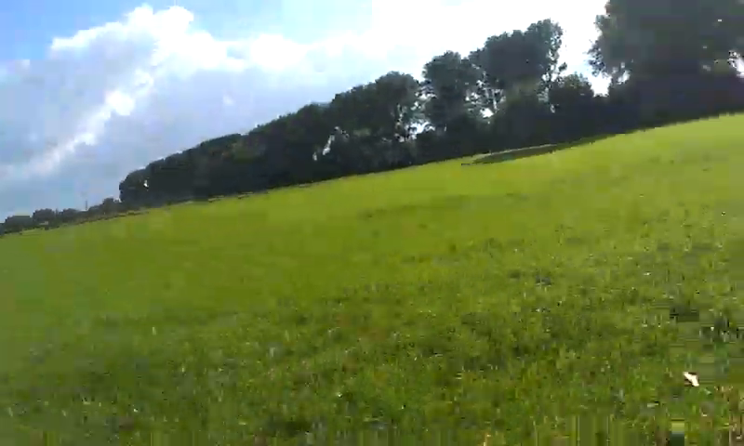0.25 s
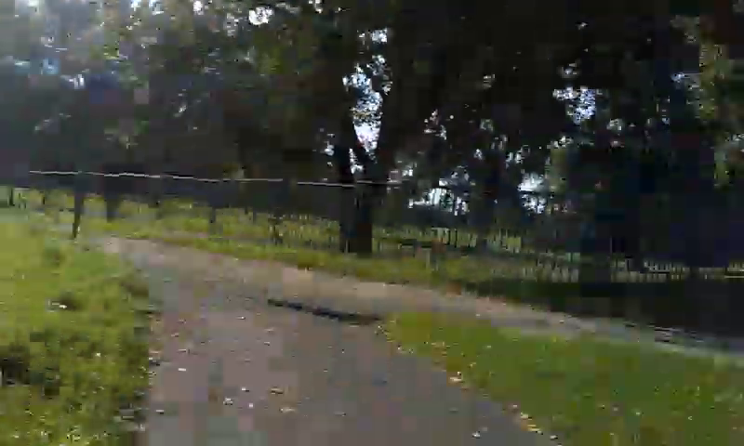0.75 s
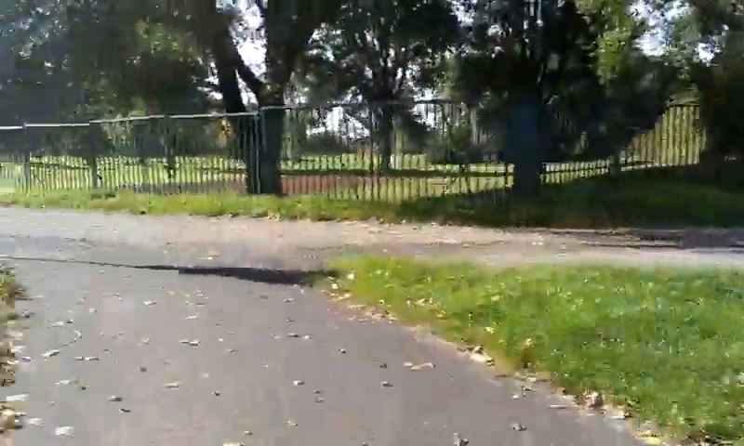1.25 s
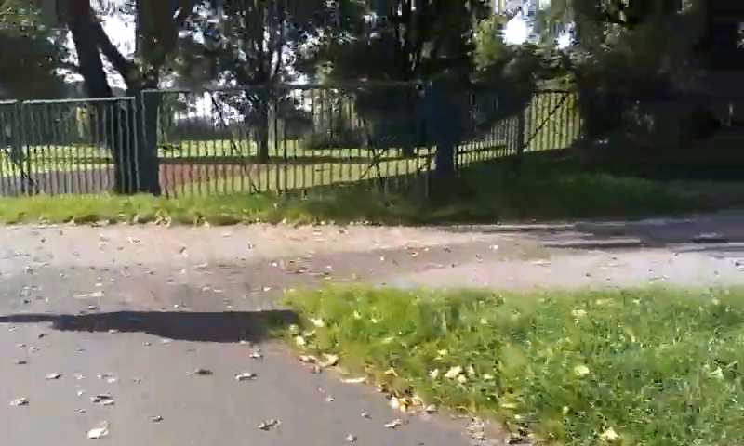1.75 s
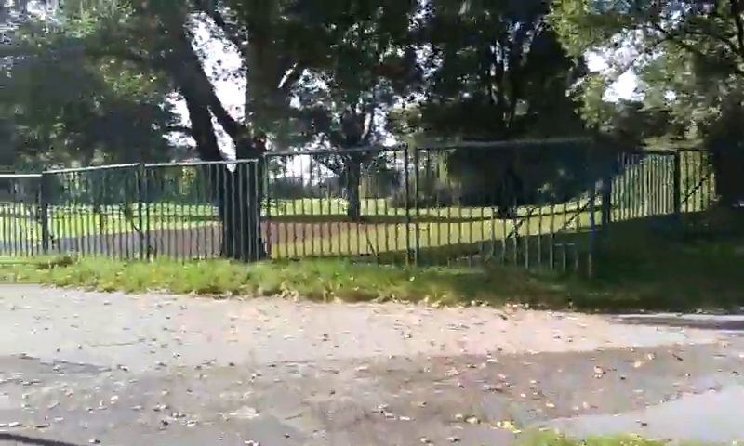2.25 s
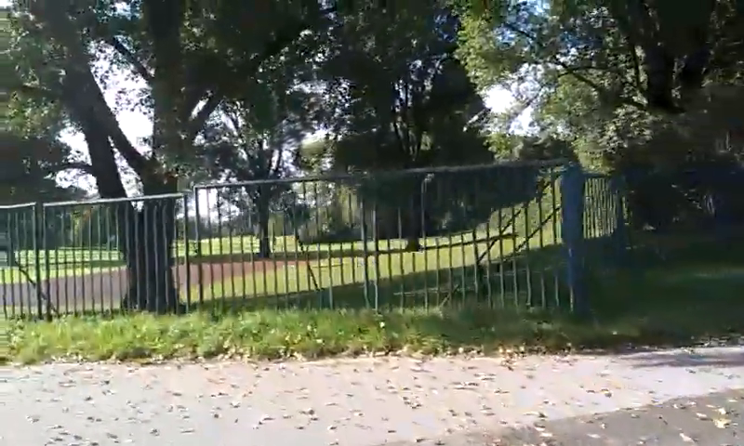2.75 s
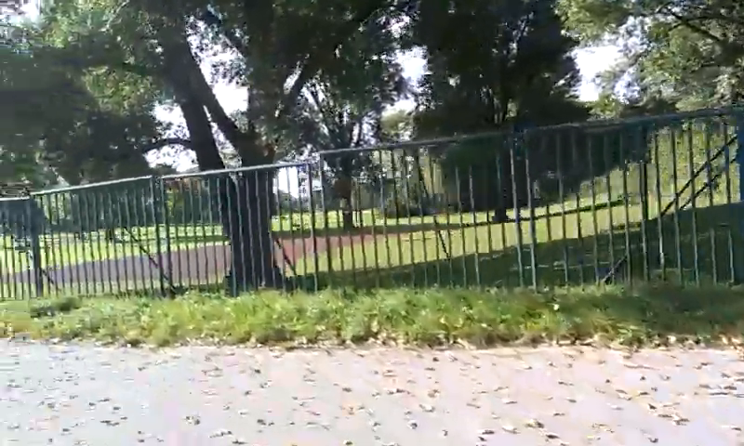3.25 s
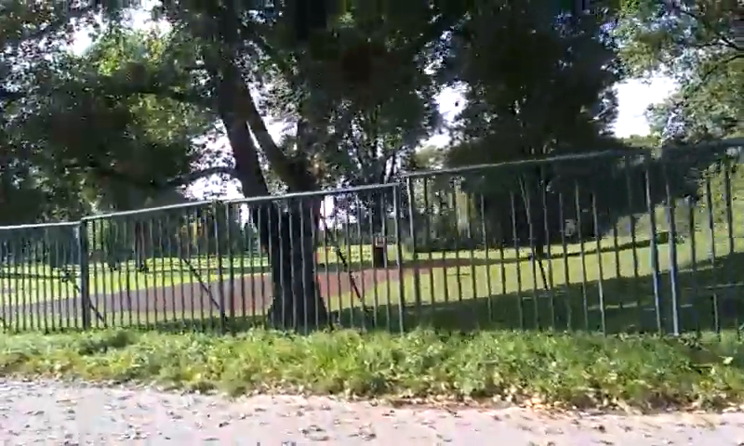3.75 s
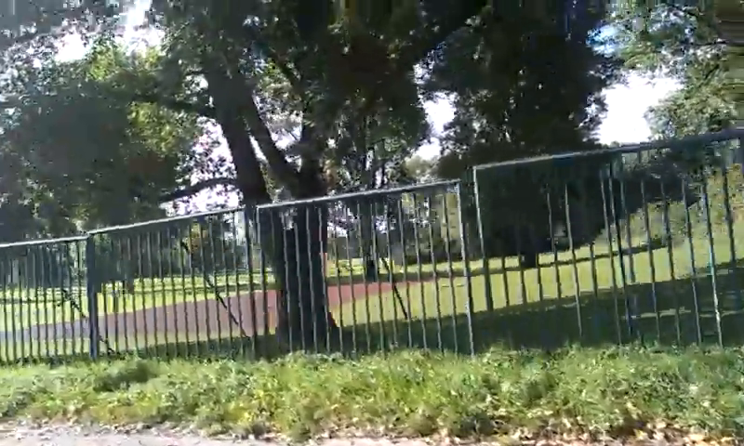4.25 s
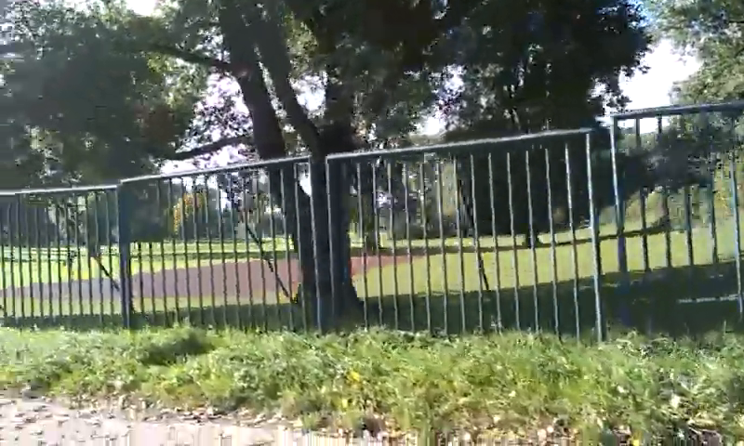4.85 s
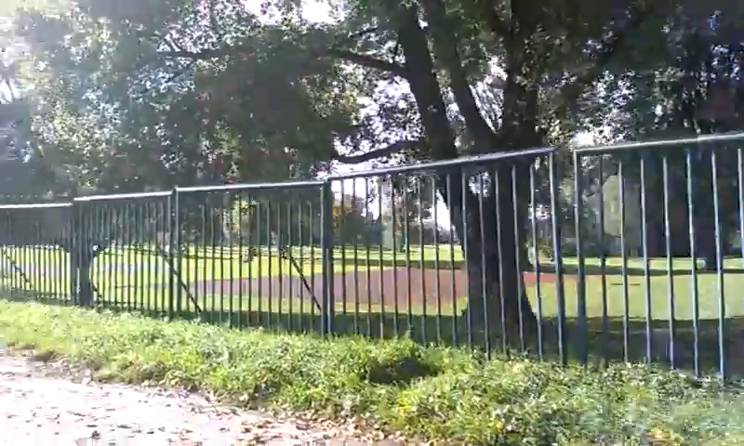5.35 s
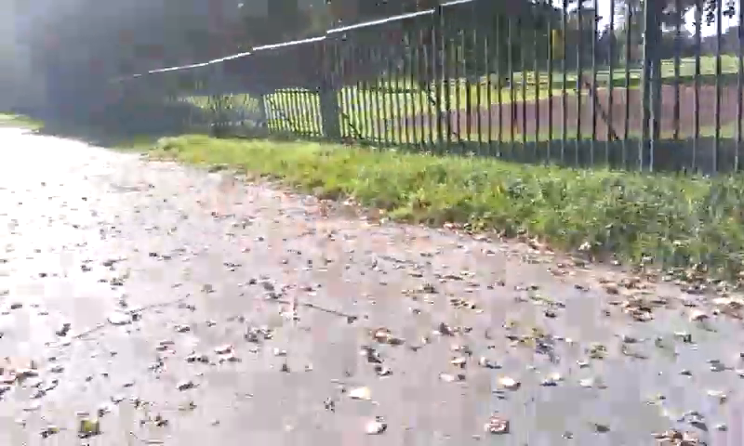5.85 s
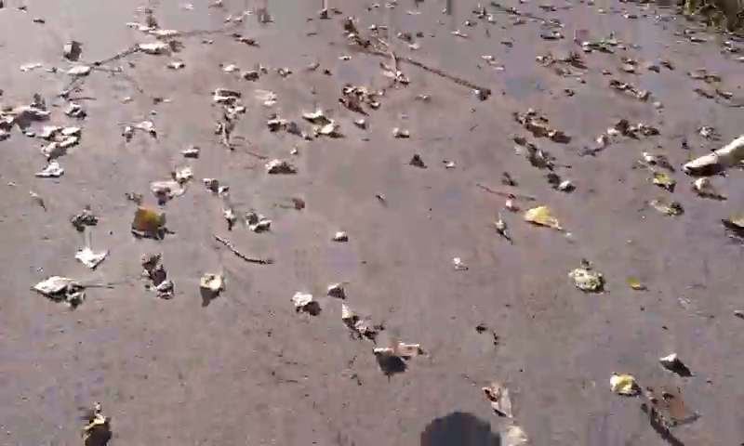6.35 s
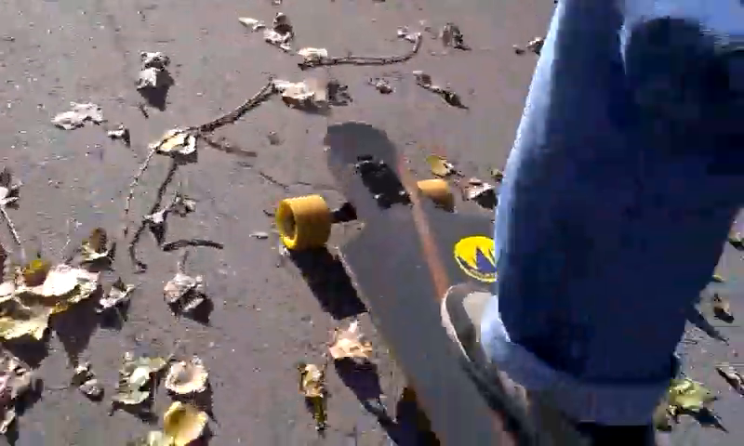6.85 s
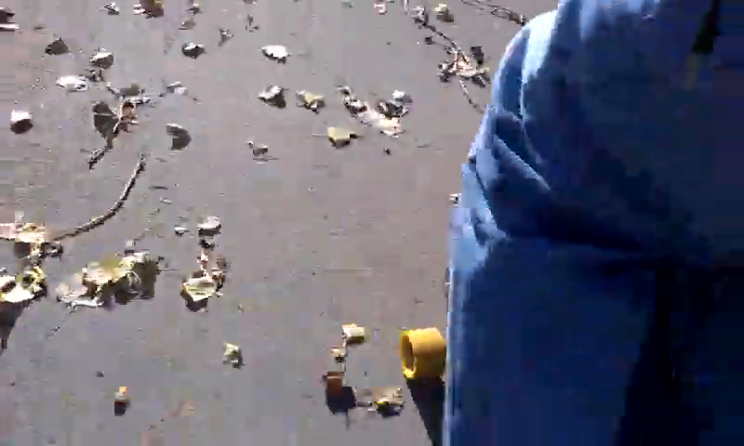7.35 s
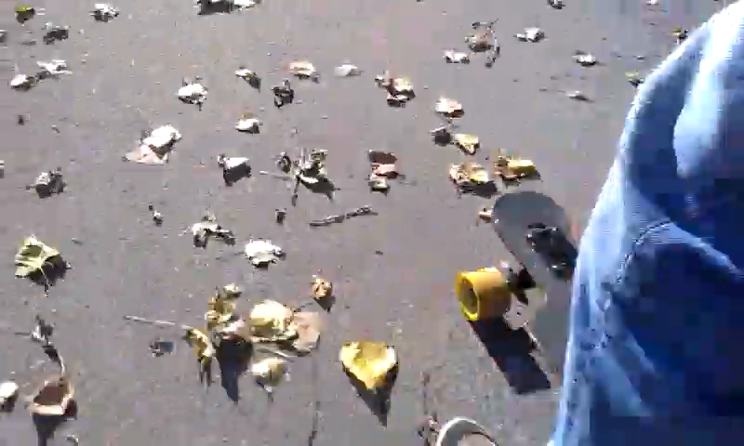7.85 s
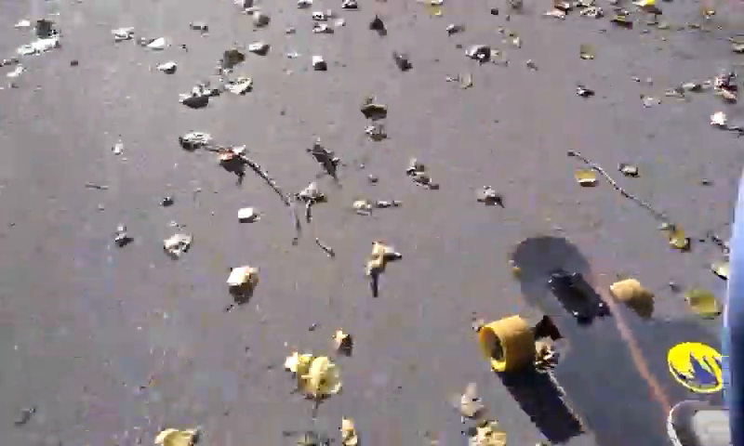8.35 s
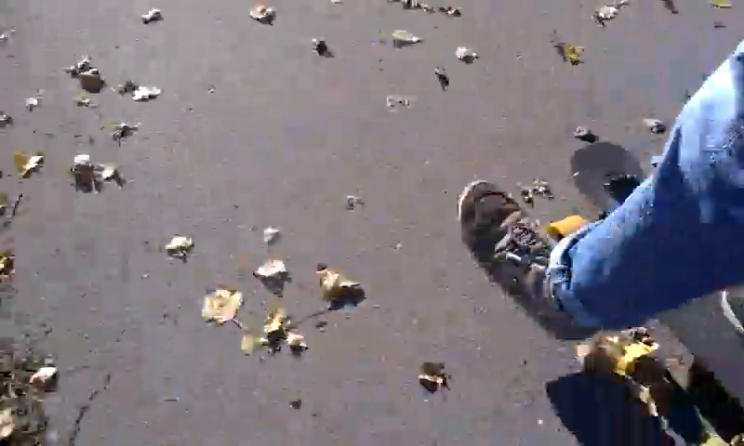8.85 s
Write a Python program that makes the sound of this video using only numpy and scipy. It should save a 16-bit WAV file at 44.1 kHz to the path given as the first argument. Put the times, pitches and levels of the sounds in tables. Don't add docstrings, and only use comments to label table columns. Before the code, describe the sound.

Rough gritty skateboard rolling outdoors, with deck rattles, stone knocks and crackling leaves, ending in loud, distorted bursts of wind buffeting.

```python
import sys
import numpy as np
from scipy import signal
from scipy.fft import rfft, irfft, next_fast_len
from scipy.io import wavfile
from scipy.ndimage import uniform_filter1d, map_coordinates

SR = 44100
rng = np.random.default_rng(int(sys.argv[2]) if len(sys.argv) > 2 else 0)


def natural_amplitude(level_db):
    exponent = np.asarray(level_db, float) / 20
    return 10 ** exponent


def file_out(sig):
    cols = np.atleast_2d(sig).T
    lim = np.clip(cols, -1, 1)
    pcm = np.round(lim * 32767).astype(np.int16)
    wavfile.write(sys.argv[1], SR, pcm)


N = 402191

# centre_hz, width_hz, level_db
AXLE_MODES = [(1585, 190, 8.5), (2208, 155, 12), (3000, 2000, 0.5)]


def unit(x):
    return x / np.sqrt(np.mean(x ** 2) + 1e-20)


def curves(rows):
    s, *cols = np.transpose(rows)
    return [np.interp(np.arange(N) / SR, s, c) for c in cols]


def wobble(knots_per_s):
    knots = rng.standard_normal(int(N * knots_per_s / SR) + 4)
    return map_coordinates(knots, [np.arange(N) * knots_per_s / SR])


def filtered(x, response):
    m = next_fast_len(N + 8192)
    return irfft(rfft(x, m) * response(np.fft.rfftfreq(m, 1 / SR)), m)[:N]


def colour(points):
    f, db = np.transpose(points)
    return lambda hz: natural_amplitude(np.interp(np.log(hz + 1), np.log(f + 1), db))


def body(modes):
    def response(hz):
        total = 0
        for k, (centre_hz, width_hz, db) in enumerate(modes):
            damping = 1j * hz * width_hz
            total = total + (-1) ** k * natural_amplitude(db) * damping / (centre_hz * centre_hz - hz * hz + damping)
        return total
    return response


def gritty(lump_db, rate):
    clumps = wobble(rate) + 0.98 * wobble(rate * 7)
    return unit(rng.standard_normal(N) * natural_amplitude(lump_db * clumps))


def chips(per_s):
    hit = rng.random(N) < per_s / SR * natural_amplitude(4 * wobble(9))
    return unit(hit * rng.standard_normal(N))


def bursts(lengths_ms, spiky_db, size=4096):
    length_s = np.clip(lengths_ms, 1, 60)[:, None] / 1000 + 0.0021
    u = np.arange(size) / SR / length_s
    shape = np.clip(u / 0.067, 0, 1) * np.exp(-u ** 4 * 0.95)
    shape = shape * (1 + 0.93 * np.exp(-6 * u))
    grains = rng.standard_normal(u.shape)
    clumps = uniform_filter1d(rng.standard_normal(u.shape), size=24, axis=1) * np.sqrt(24)
    cracks = uniform_filter1d(clumps, size=200, axis=1) * np.sqrt(200 / 24)
    return grains * natural_amplitude(spiky_db * (clumps + 0.63 * cracks)) * shape


def placed(rows, times_s, levels_db, lengths_ms):
    rms = np.sqrt(np.sum(rows ** 2, axis=1) / (np.clip(lengths_ms, 1, 60) * SR / 1000))
    scaled = rows * (natural_amplitude(levels_db) / rms)[:, None]
    at = np.round(times_s * SR).astype(int)[:, None] + np.arange(rows.shape[1])
    return np.bincount(at.ravel(), scaled.ravel(), N + rows.shape[1])[:N]


def aim(s):
    turn_s = [0, .45, .8, 1.2, 1.5, 2.05, 5.2, 5.9, 6.6]
    turn_aim = [0, .7, 1, 1.2, 2, 3, 3, 4, 5]
    return np.interp(s, turn_s, turn_aim)


def sliding(x, spectrum, aims, share, shake, patchy_db):
    hz, t, z = signal.stft(x, SR, nperseg=1024)
    frame = np.minimum(t * SR, N - 1).astype(int)

    def now(values):
        return np.interp(aim(t), np.arange(len(values)), values)

    def jolt():
        return wobble(16)[frame]

    patches = uniform_filter1d(rng.standard_normal(z.shape), size=16, axis=0)
    patches = unit(uniform_filter1d(patches, size=5, axis=1))
    lift_db = 0
    for centre_hz, db in np.transpose(aims, (1, 2, 0)):
        peak_db = now(db) * (1 + .12 * jolt())
        offset = hz[:, None] / now(centre_hz) / (1 + shake * jolt()) - 1
        lift_db = lift_db + peak_db * np.exp(-(offset / share) ** 2)
    z = z * natural_amplitude(patchy_db * patches) * colour(spectrum)(hz)[:, None] * natural_amplitude(lift_db)
    return unit(signal.istft(z, SR, nperseg=1024)[1][:N])


def wheels():
    # time_s, deck_db, grit_db
    roll = [(0, -31.5, -38.5), (.3, -31.5, -38), (.8, -31.5, -34.5), (1.6, -32.5, -38), (2.2, -32, -40),
            (2.9, -33, -42.5), (3.5, -33.5, -39.5), (3.95, -23.5, -40.5), (4.3, -21, -38.5),
            (4.5, -30.5, -41), (5, -28, -40), (5.6, -34.5, -40), (6.5, -34.5, -37), (6.7, -29.5, -30),
            (7.2, -30.5, -34.5), (7.75, -22, -33.5), (7.95, -26, -29), (9.11, -23, -32.5)]
    # freq_hz, level_db_per_hz
    deck_spectrum = [(25, -51), (70, -7.5), (130, -8.5), (250, 0.5), (450, -0.5), (700, -2), (900, -12),
                     (1300, -17.5), (1900, -34), (2600, -40.5), (3500, -64)]
    # freq_hz, level_db_per_hz
    grit_spectrum = [(1500, -27), (2400, 0.5), (4000, -2.5), (6000, 2), (7600, -0.5), (8400, -4),
                     (10000, -7), (13000, -11.5), (15600, -16)]
    # freq_hz, lift_db
    deck_aims = [
        [(620, 1), (1700, 14), (1280, 0), (2500, 0)],
        [(608, 7), (1760, 18.5), (1510, 11), (2500, -4)],
        [(560, 10.5), (1540, 12), (1230, -5), (2310, 10)],
        [(560, 6.5), (1560, 5.5), (1260, -4), (2130, 12)],
        [(800, 5), (1540, 12), (1200, .6), (2300, 9)],
        [(798, 8.5), (1550, -5), (1200, -3.5), (2540, 19.5)],
    ]
    # freq_hz, lift_db
    hand_aims = [
        [(3370, 8.5), (5300, 6), (6200, 3), (7400, 2), (11000, -3), (9500, -1), (14000, 0)],
        [(3270, 4), (5100, 5.5), (7140, 11.5), (8250, 8.5), (12000, 0), (10200, 1), (14700, 4)],
        [(3240, 5), (4880, 3.5), (6600, 7), (7500, 3.5), (11500, 3), (8600, 4), (14300, 3)],
        [(3330, 4.5), (4070, 6), (6500, 7.5), (7350, 14), (11500, 3.5), (9000, 0.5), (14200, 3)],
        [(3200, 4), (3800, 4), (6100, 9.5), (7300, 6), (11800, 1), (9000, 2), (14500, 2)],
        [(2970, 5), (5050, 6), (5600, 2), (7100, 6), (11700, 1), (8800, 3), (14500, 1)],
    ]
    rumble_db, hiss_db = curves(roll)
    patch = wobble(25)
    axle_db = 1.4 * (rumble_db + 35.5).clip(-9, 5) - 59.5
    axle = natural_amplitude(axle_db) * unit(filtered(chips(per_s=120), body(AXLE_MODES[:2])))
    bumps = gritty(lump_db=1.6, rate=30) + .35 * chips(per_s=80)
    deck = sliding(bumps, deck_spectrum, deck_aims, share=.1, shake=.008, patchy_db=1.2)
    grit = gritty(lump_db=1.95, rate=40) + 0.47 * chips(per_s=150)
    hiss = sliding(grit, grit_spectrum, hand_aims, share=0.057, shake=.007, patchy_db=1.5)
    deck_db = np.minimum(rumble_db, -27) + 0.5 + 0.86 * patch
    return axle + natural_amplitude(deck_db) * deck + natural_amplitude(hiss_db + 0.27 * patch) * hiss


def stones():
    # start_s, rms_db, rattle_ms, ring_hz, clack_db
    knocks = [(.242, -26, 15, 620, -9), (.332, -22.5, 8.9, 800, -16), (0.344, -35, 4.2, 620, 5),
              (5.535, -27.5, 14, 600, -8.5), (1.416, -24, 16, 330, -38), (1.783, -26, 12, 332, -31),
              (3.242, -29.5, 28, 537, -21), (3.543, -24, 28, 494, -12.5), (3.725, -20, 21, 620, -20),
              (3.863, -25, 38, 600, -13.5), (3.991, -14, 16.5, 495, -18.5), (4.015, -22, 44, 560, -13.5),
              (4.053, -23, 23, 560, -23), (4.231, -19.5, 26, 510, -16.5), (4.297, -18, 27, 730, -18),
              (4.474, -21.5, 4.9, 654, -24), (4.589, -27, 36, 576, -14), (4.795, -26, 18, 700, -15),
              (5.752, -18, 6.1, 497, -21), (6.61, -28, 25, 596, -10), (6.69, -27, 57, 650, -21),
              (6.735, -26.5, 43, 710, -12), (6.795, -24.5, 52, 780, -11), (6.945, -22, 17, 760, -22),
              (6.855, -18, 9.6, 650, -17), (7.044, -14.5, 11.4, 666, -13), (7.075, -22.5, 40, 655, -16),
              (7.266, -24.5, 15, 800, -27), (7.361, -16, 28, 650, -21)]
    s, db, ms, ring_hz, clack_db = np.transpose(knocks)
    rows = rfft(bursts(ms, spiky_db=2.5))
    hz = np.fft.rfftfreq(4096, 1 / SR)
    deck_modes = [(ring_hz[:, None], 130, .1), (260, 200, -13), (950, 250, -14)]
    ring = body(deck_modes)(hz) / (1 + (hz / 1200) ** 4)
    clack = body(AXLE_MODES)(hz)
    return placed(irfft(rows * ring), s, db, ms) + placed(irfft(rows * clack), s, db + clack_db, ms)


def leaves():
    # start_s, rms_db, crunch_ms, centre_hz
    crunches = [(.572, -28.5, 27, 6600), (.881, -32.5, 15, 7260), (1.192, -39, 52, 7160),
                (1.325, -38, 15, 4020), (2.406, -37.5, 20, 6500), (2.808, -32.5, 19, 3700),
                (3.082, -37.5, 36, 5300), (3.228, -33, 47, 6600), (3.26, -32.5, 26, 3990),
                (3.542, -39, 28, 6860), (3.663, -27, 29, 4730), (5.319, -31.5, 33, 6700),
                (5.507, -35, 20, 6200), (5.704, -32, 53, 6200), (5.845, -34, 28, 7000),
                (6.015, -27, 14, 6000), (6.221, -29, 19, 5300), (6.282, -29.5, 94, 5900),
                (6.603, -26.5, 24, 5500), (6.84, -40, 28, 7020), (7.032, -26.5, 17, 5430),
                (7.717, -31, 20, 5440), (7.895, -31, 56, 6300), (8.241, -27, 44, 6600),
                (8.369, -29, 20, 7160), (8.578, -30.5, 19, 7350), (8.818, -27.5, 30, 5240),
                (8.899, -30, 52, 7100), (8.99, -27.5, 32, 6600), (9.035, -28.5, 65, 5270)]
    # start_s, rms_db, crunch_ms, centre_hz
    more_crunches = [(0.303, -37.5, 13, 4440), (0.399, -32, 9.5, 5920), (.715, -35, 25, 8800),
                     (1.226, -33.5, 11, 6780), (1.364, -32, 14, 7500), (1.927, -27.5, 16, 6300),
                     (2.3, -22, 6.2, 4200), (2.454, -33.5, 5.3, 3920), (2.86, -32.5, 12, 5900),
                     (3.68, -24, 9.3, 6400), (4.304, -38, 18, 5630), (4.943, -30.5, 13, 4100),
                     (5.599, -33, 21, 6540), (5.696, -27.5, 12, 3520), (5.748, -26, 3.1, 3900),
                     (5.756, -14, 1.4, 3800), (6.808, -24.5, 14, 3000), (6.811, -20, 6.9, 1790),
                     (6.933, -41, 4.1, 7000), (7.086, -32.5, 17, 5200), (7.116, -35, 11, 3710),
                     (7.366, -24.5, 4, 2780), (7.848, -30.5, 13, 6800), (7.946, -27.5, 30, 2840),
                     (8.008, -18.5, 7.4, 5300), (8.419, -29, 7.6, 7150), (8.528, -33, 17, 5060),
                     (8.74, -31, 4.6, 5440), (9.089, -20, 10.4, 7150)]
    # start_s, peak_db, centre_hz
    crumbs = [(0.3331, -19, 6110), (0.5192, -19, 6930), (0.8375, -21, 7110), (0.9827, -17, 6910),
              (1.1394, -22, 7280), (1.8243, -22.5, 6530), (2.0443, -29, 7310), (2.1036, -26, 7180),
              (2.3391, -24, 7160), (2.4917, -31, 7230), (2.5865, -24, 7270), (2.6105, -27, 7170),
              (2.942, -22, 7500), (3.197, -17.5, 7210), (3.3594, -18.5, 7120), (3.4296, -15.5, 6540),
              (3.6331, -25, 7250), (3.7743, -28, 7040), (3.8881, -17, 5990), (3.922, -23, 6770),
              (3.9754, -28, 6860), (3.9948, -22, 7290), (4.0294, -19, 7170), (4.2283, -20, 7310),
              (4.4363, -31, 7460), (4.6897, -23, 7360), (4.789, -35, 6990), (4.807, -21, 7390),
              (4.8364, -23, 7330), (4.8833, -34, 7260), (4.9033, -17, 6010), (5.0, -24, 7290),
              (5.03, -18, 6930), (5.049, -15.5, 7410), (5.1494, -21.5, 7360), (5.9584, -26, 5960),
              (6.5216, -21.5, 5590), (6.7231, -20, 6760), (6.832, -18, 6640), (6.8894, -22, 7670),
              (7.0005, -20, 4990), (7.2672, -16, 7130), (7.6141, -8.5, 6390), (7.7438, -14, 5500),
              (7.8072, -31, 7000), (7.8983, -8.5, 4500), (8.0466, -15, 4480), (8.104, -12, 7550),
              (8.1858, -19, 5300), (8.2894, -10.5, 4750), (8.4273, -8, 6840), (8.5994, -26, 5260),
              (8.9194, -14, 4750)]
    crumb_ms, rms_under_peak_db = 4.3, 12.5
    crumb_rows = [(at, peak_db - rms_under_peak_db, crumb_ms, hz) for at, peak_db, hz in crumbs]
    s, db, ms, centre_hz = np.transpose(list(crunches) + list(more_crunches) + crumb_rows)
    is_crumb = np.arange(len(s)) >= len(crunches) + len(more_crunches)
    edge_db = -11.5 + 31.5 * np.log2(centre_hz / 6000)
    edge_db = edge_db + 5 * (aim(s) > 4.2) - 5 * is_crumb
    rows = bursts(ms, spiky_db=3.5)
    hz = np.fft.rfftfreq(rows.shape[1], 1 / SR) + 1
    hump = np.exp(-(np.log(hz / centre_hz[:, None]) / .17) ** 2)
    band = hz ** 4 / (hz ** 4 + 2800 ** 4) / (1 + (hz / 8000) ** 10)
    broad = natural_amplitude(0.6 * edge_db + 11.0)[:, None] * band
    edge = natural_amplitude(edge_db + 5.5)[:, None] / (1 + (8000 / hz) ** 10) * (9000 / hz) ** 2.0
    return placed(irfft(rfft(rows) * (hump + broad + edge)), s, db, ms)


def airstream(steady_db, gusts):
    # freq_hz, level_db_per_hz
    roar_spectrum = [(12, -40), (25, -26), (60, -10), (130, 3.5), (210, 3), (330, 0.5), (500, -1),
                     (800, -14), (1200, -52)]
    # freq_hz, level_db_per_hz
    tear_spectrum = [(300, -48), (600, 7), (900, 8), (1500, 1), (2500, -11), (4000, -37)]
    rise_db_s, fall_db_s = 2400, 650
    t = np.arange(0, N / SR + .01, .001)
    gust_amp = 0
    for s, hold_s, db, _ in gusts:
        before_s, after_s = (s - t).clip(0), (t - s - hold_s).clip(0)
        gust_amp = gust_amp + natural_amplitude(db - rise_db_s * before_s - fall_db_s * after_s)
    blast = natural_amplitude(steady_db) + np.interp(np.arange(N) / SR, t, gust_amp)
    tear_db, = curves([(s + hold_s / 2, edge_db) for s, hold_s, _, edge_db in gusts])
    shed = (rng.random(N) < 330 / SR * natural_amplitude(1.5 * wobble(40))) * rng.uniform(-0.88, 1, N)
    eddies = unit(shed) + 0.84 * gritty(lump_db=1.5, rate=45)
    torn = (unit(shed ** 3) + 1.6 * eddies) * natural_amplitude(1.6 * wobble(70))

    def swing(points):
        return lambda hz: colour(points)(hz) * np.exp(-1.2j)

    roar = unit(filtered(eddies, swing(roar_spectrum)))
    tear = unit(filtered(torn, swing(tear_spectrum)))
    return blast * (roar + natural_amplitude(tear_db + 6.0) * tear)


def pops():
    # start_s, peak_db, pitch_hz
    strikes = [(5.75, -12, 200), (7.851, 1, 298), (7.156, -5, 144), (7.188, -5, 248), (7.221, -26, 215),
               (7.313, -3, 253), (7.358, -9, 220), (7.409, -11, 333), (7.43, 4, 214), (7.503, 2.5, 91),
               (7.504, 5.5, 200), (7.531, 1.5, 200), (7.61, 6.5, 168), (7.729, 5, 163), (7.776, -1, 102),
               (7.859, 9, 202), (7.908, -5, 120), (7.959, 7, 278), (8.044, 10, 204), (8.088, 1, 227),
               (8.11, 0, 188), (8.298, -1, 182), (8.373, -2, 172), (8.489, 3, 417), (8.635, 8.5, 293),
               (8.674, 4, 220), (8.751, -4, 151), (8.962, -19, 695), (8.963, 4, 210), (9.005, 0, 186),
               (9.085, -2, 600)]
    # start_s, peak_db (before a 5 dB lift), pitch_hz
    snaps = [(7.866, 6.5, 207), (8.057, -2, 257), (8.124, 2, 208), (8.138, 3, 272), (8.21, 8, 167),
             (8.257, 2, 152), (8.321, -9, 213), (8.345, -3, 151), (8.381, 6, 268), (8.406, 5.5, 170),
             (8.429, 7, 260), (8.47, -5, 409), (8.512, -4, 170), (8.53, -7, 169), (8.544, -3, 261),
             (8.693, 0.5, 156), (8.706, -5, 327), (8.755, -3, 159), (8.76, 1, 153), (8.784, 3, 422),
             (8.794, -3, 213), (8.822, -4, 153), (8.84, -3, 155), (8.855, -7, 160), (8.868, 0, 282),
             (8.914, -8, 151), (8.923, -1.5, 205), (8.951, -1, 194), (9.012, -6, 500), (9.025, -5, 212),
             (9.047, -5, 218)]
    raised = [(at, peak_db + 5, hz) for at, peak_db, hz in snaps]
    s, db, hz = np.transpose(list(strikes) + raised)
    turn = hz[:, None] * np.arange(1024) / SR
    pulse = np.sin(2 * np.pi * turn) * np.sqrt(turn) * np.exp(-1.8 * turn)
    pulse += 0.12 * np.sin(2 * np.pi * 4.28 * turn) * np.exp(-(turn - .45) ** 2 * 40)
    return placed(pulse * rng.choice([-1, 1], (len(s), 1)), s, db - 10.5, 1000 / hz)


def wind():
    # time_s, buffet_db, steady_db
    air = [(0, -28, -60), (.65, -40.5, -56), (.87, -33.5, -40.5), (1.2, -34.5, -32.5), (1.85, -32.5, -25),
           (2.2, -46.5, -44.5), (2.66, -50, -35), (3.55, -48.5, -58), (4.27, -42, -61), (5.06, -51, -74),
           (6.36, -50, -41), (6.75, -32.5, -41.5), (7, -31, -26.5), (7.8, -26, -24.5), (8.55, -48, -27),
           (8.62, -34, -50), (9.11, -25, -32)]
    # freq_hz, level_db_per_hz
    buffet_spectrum = [(8.8, -35), (15, -1), (32, 1.5), (71, -1), (200, -13), (260, -27), (440, -120)]
    # start_s, hold_s, airstream_db, tear_db
    gusts = [(1.495, .01, -29, -33), (6.675, 0.18, -34, -4.5), (7.071, 0.032, -17.5, -27),
             (7.161, 0.032, -21.5, -39), (7.305, 0.017, -16.5, -19), (7.358, 0.037, -12, -33),
             (7.483, 0.09, -17.5, -29), (7.599, 0.059, -18.5, -21.5), (7.729, 0.016, -23, -24),
             (7.863, 0.012, -4.5, -12.5), (7.918, 0.035, -13.5, -9.5), (7.96, 0.058, -6.5, -12.5),
             (8.045, 0.018, -6.5, -17), (8.108, 0.072, -8.5, -15), (8.198, 0.081, -6, -16),
             (8.309, 0.13, -9, -11.5), (8.47, 0.062, -12.5, -12.5), (8.545, 0.053, -19.5, -21),
             (8.633, 0.003, -11, -10), (8.674, 0.033, -7.5, -10), (8.746, 0.11, -10.5, -8.5),
             (8.88, 0.045, -12.5, -12), (8.952, 0.022, -8, -7), (9.008, 0.088, -13.5, -2),
             (9.116, 0.018, -1.5, -5)]
    buffet_db, steady_db = curves(air)
    buffet = natural_amplitude(buffet_db) * unit(filtered(gritty(lump_db=2.0, rate=13), colour(buffet_spectrum)))
    push = .75 * airstream(steady_db, gusts) + pops()
    stiff = np.tanh(push * .75) / .75
    return buffet + filtered(stiff, lambda hz: 1 / (1 + (hz / 3200) ** 4))


def scene():
    return (wheels() + stones() + leaves() + wind())[None]


def roll_off(x):
    return signal.sosfilt(signal.butter(12, 15700, fs=SR, output="sos"), x)


def record(dry):
    full_scale, hardness, top_hz = 1.0, 12., 15650
    held = dry[0] / (1 + np.abs(dry[0] / full_scale) ** hardness) ** (1 / hardness)
    mix = filtered(held, lambda hz: hz < top_hz)[None]
    return roll_off(mix)


dry = scene()
out = record(dry)
file_out(out)
```